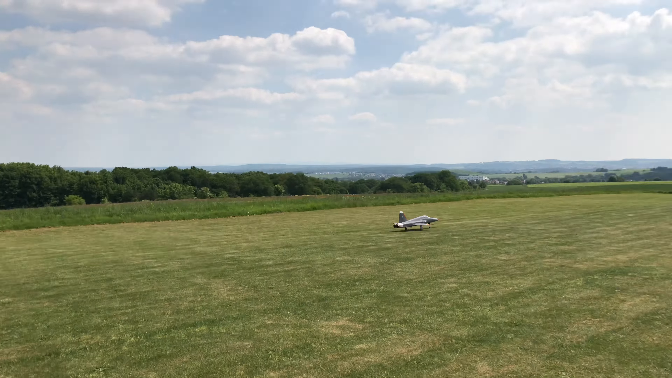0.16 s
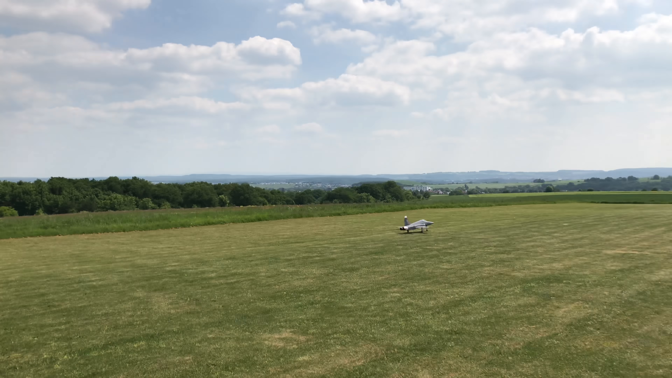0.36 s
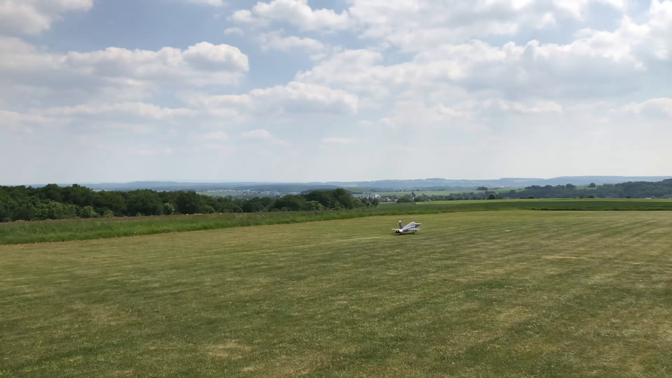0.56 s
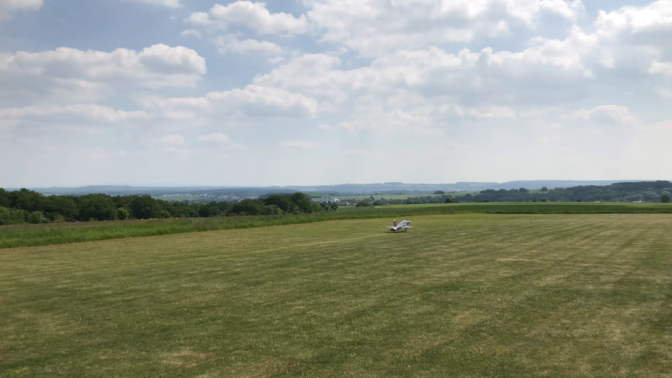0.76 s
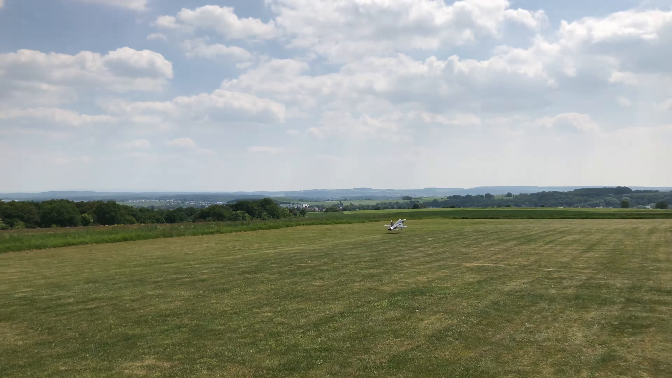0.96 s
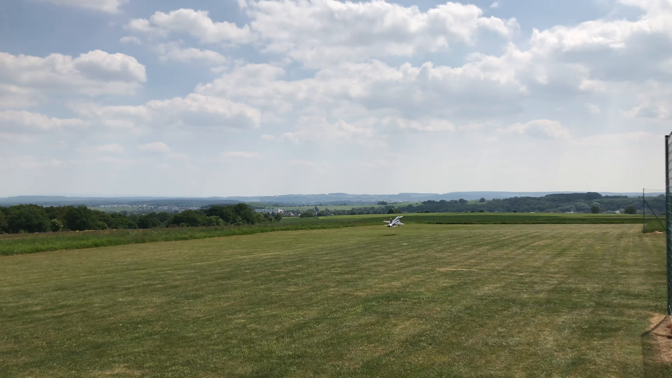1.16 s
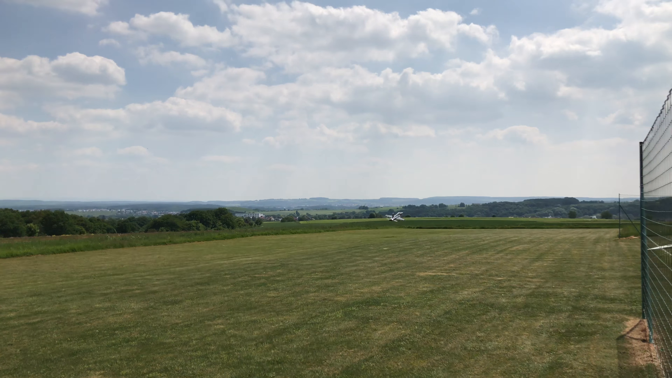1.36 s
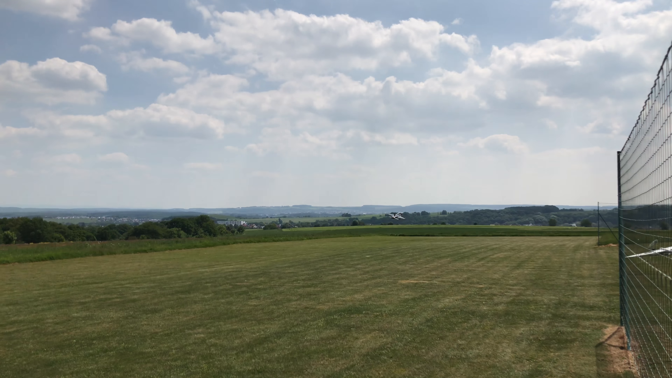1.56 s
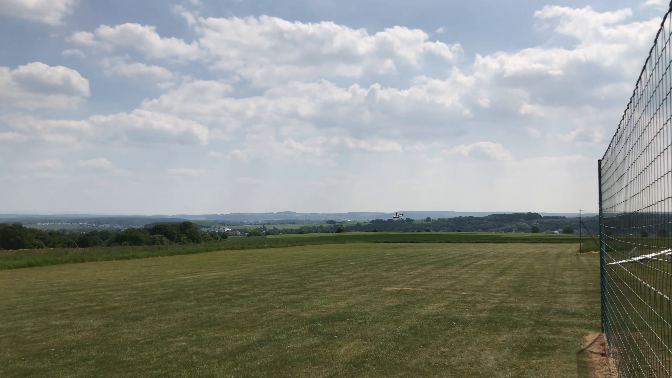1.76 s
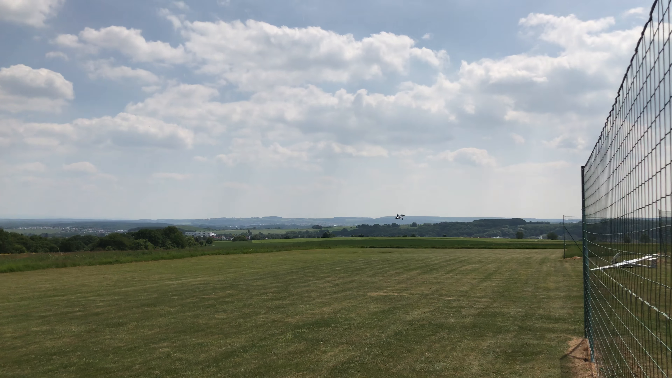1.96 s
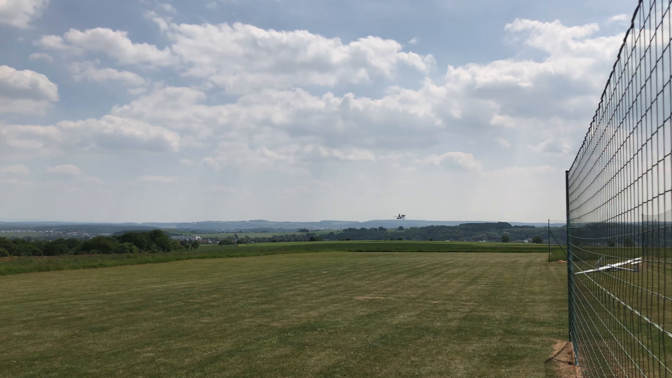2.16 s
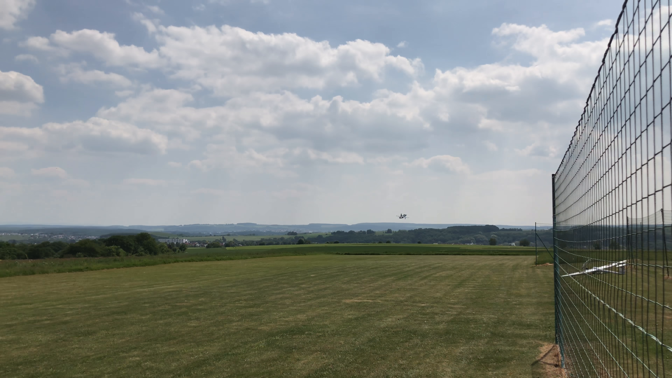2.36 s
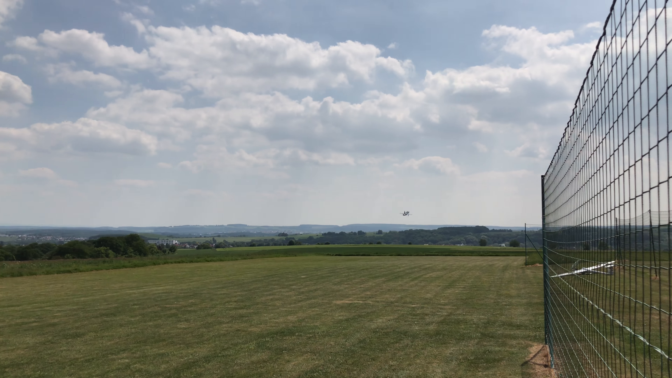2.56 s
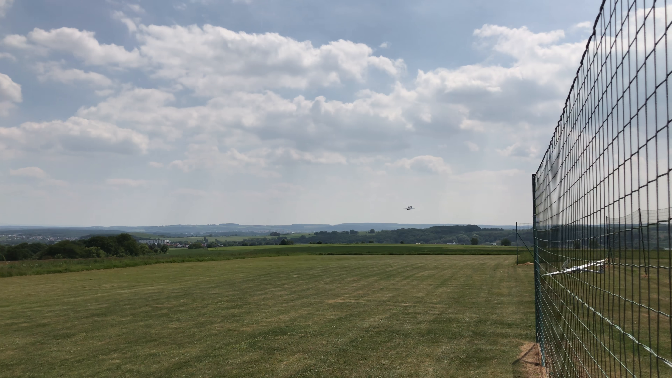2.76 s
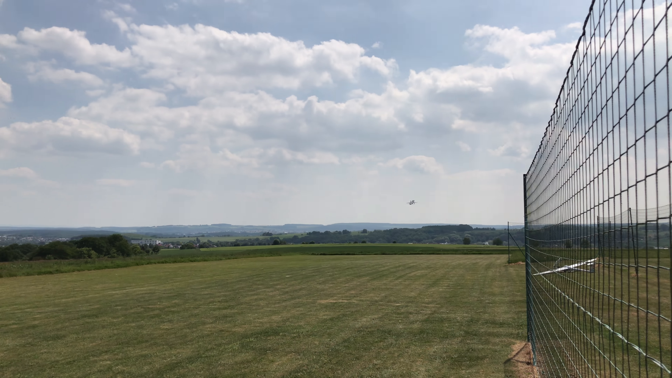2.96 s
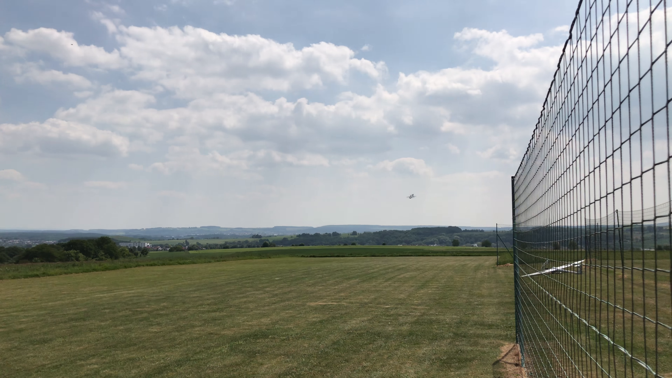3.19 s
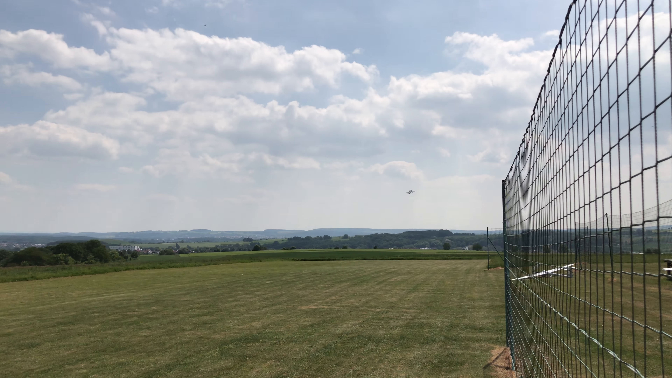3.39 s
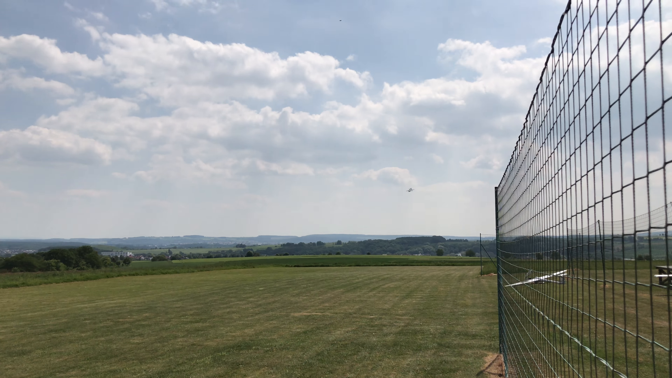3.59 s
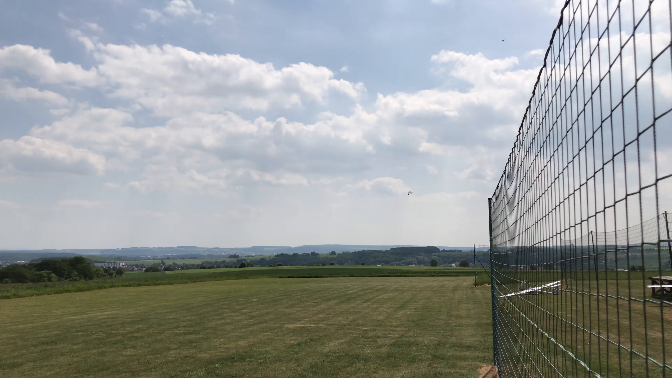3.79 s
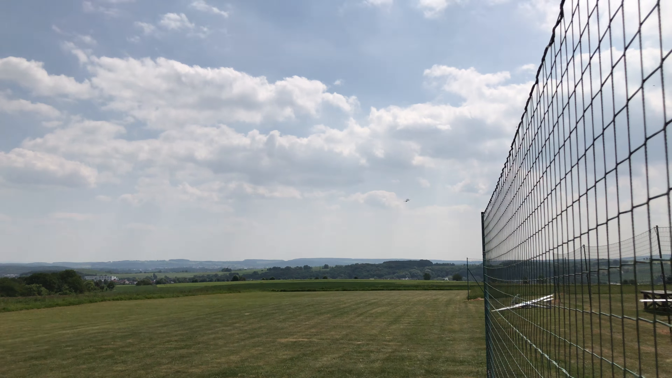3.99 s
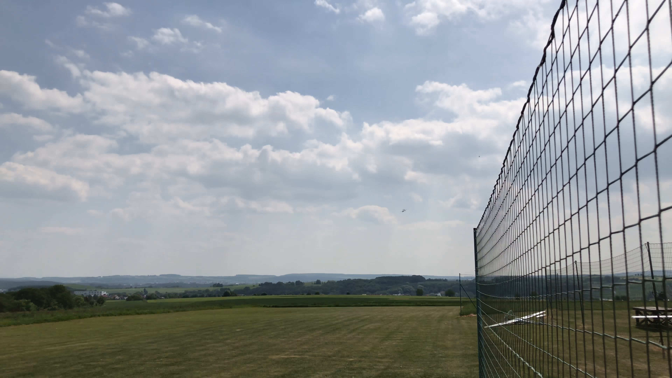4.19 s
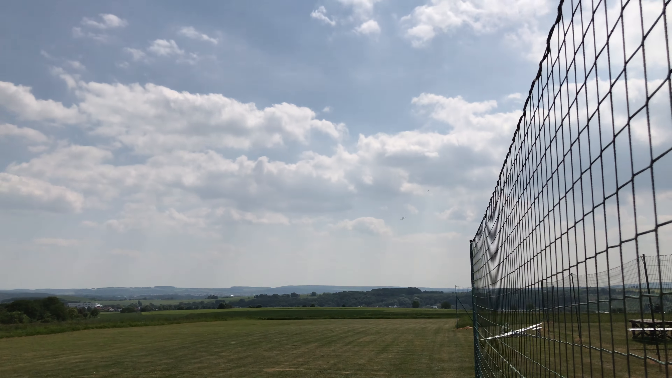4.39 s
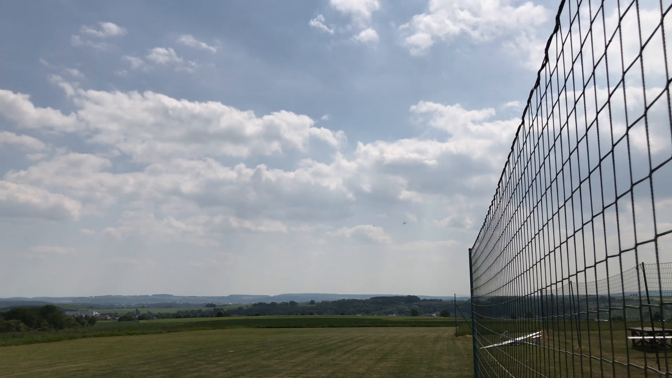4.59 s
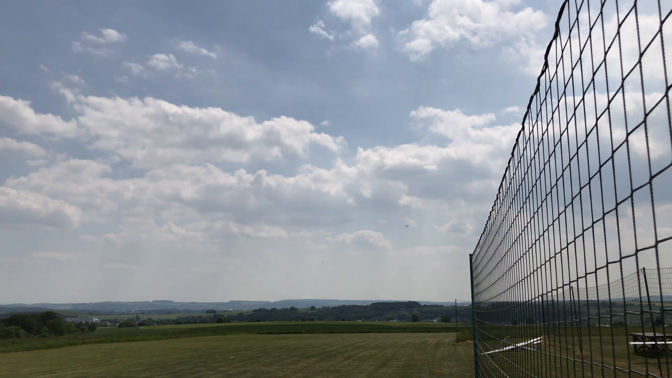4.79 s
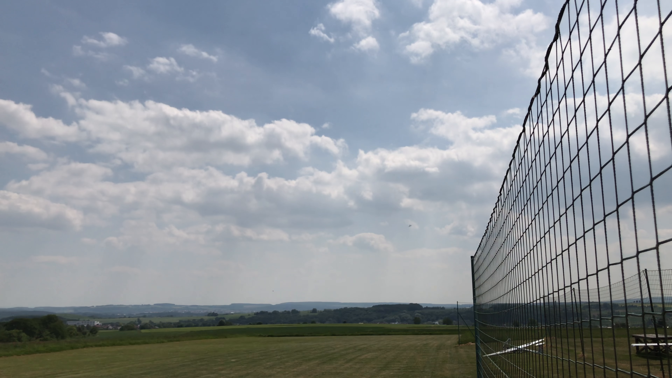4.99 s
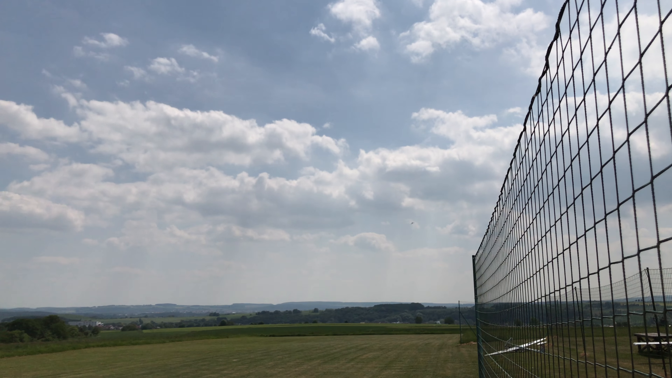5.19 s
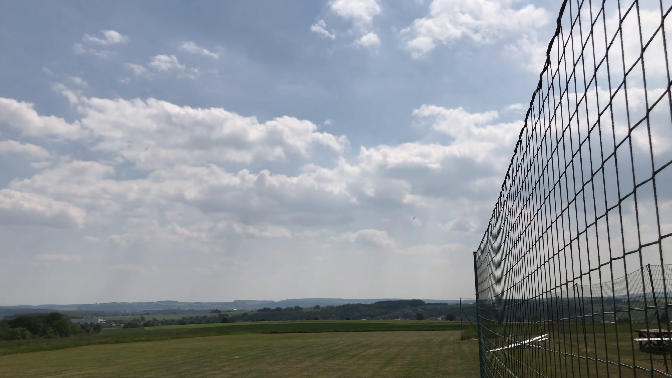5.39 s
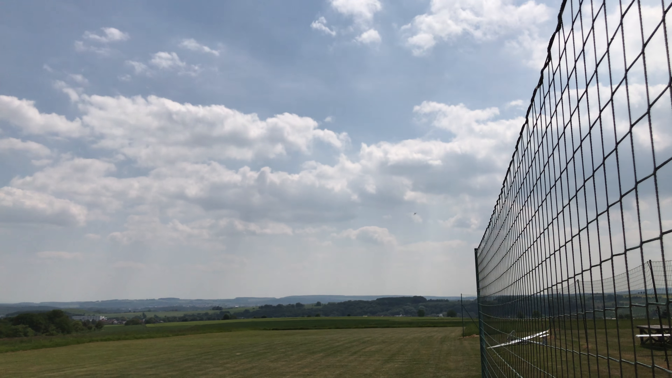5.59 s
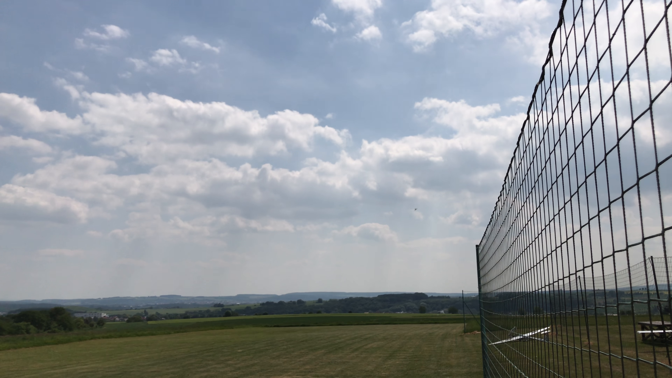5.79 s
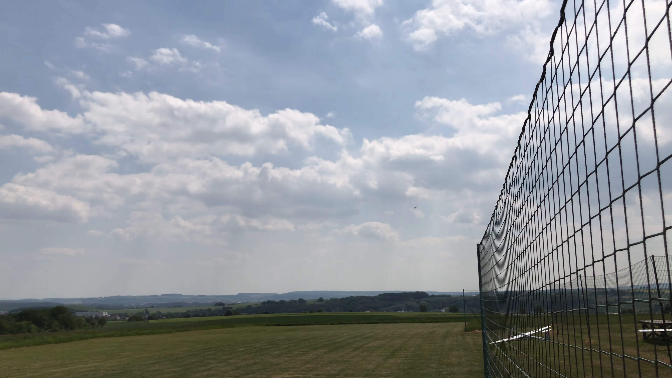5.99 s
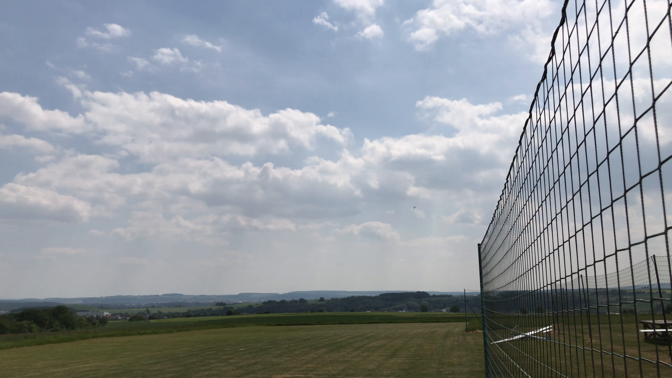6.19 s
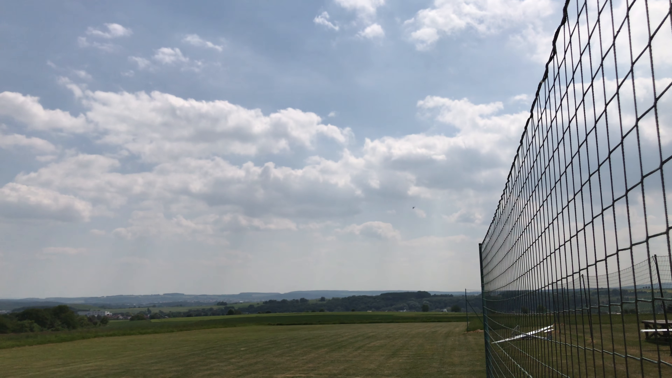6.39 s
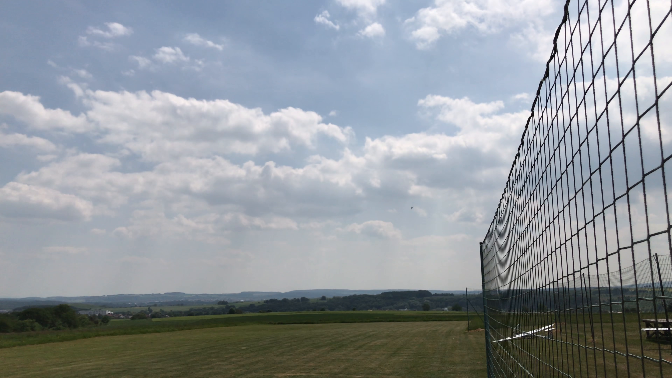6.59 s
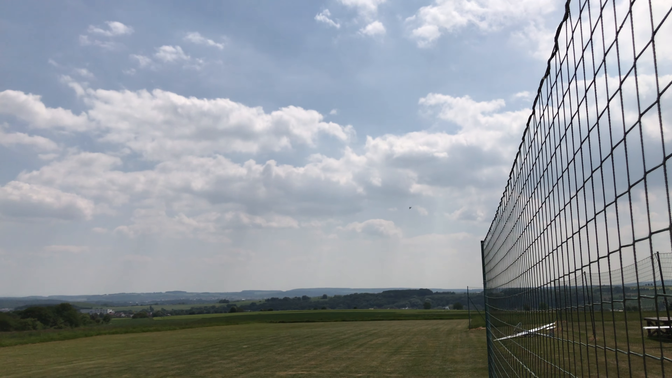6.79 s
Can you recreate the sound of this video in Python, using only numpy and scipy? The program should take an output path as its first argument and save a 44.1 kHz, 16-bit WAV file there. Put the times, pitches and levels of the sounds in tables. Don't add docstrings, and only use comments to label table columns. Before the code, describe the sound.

Outdoors on an open grass field, a model jet with electric fans starts close and loud, a shrill whine over hissing, rushing exhaust. It speeds away, fading quickly with fluttering treble and sliding hollow colouring after lift-off. Around four seconds the pitch drops steeply to a faint lower whine, rising again at the very end. Quiet countryside hum, a far engine drone and tiny insect rasps remain near the stationary microphone.

```python
import sys
import numpy as np
from scipy import signal
from scipy.io import wavfile
from scipy.ndimage import uniform_filter1d, map_coordinates

SR = 44100
rng = np.random.default_rng(int(sys.argv[2]) if len(sys.argv) > 2 else 0)


def pcm_store(signal):
    levels = np.round(np.clip(np.atleast_2d(signal), -1, 1) * 32767)
    wavfile.write(sys.argv[1], SR, levels.astype(np.int16).T)


def elevation(decibels):
    levels = np.asarray(decibels, float)
    return 10 ** (levels / 20)


N = 302085
T = np.arange(N) / SR
HZ = np.fft.rfftfreq(1024, 1 / SR)
FRAME_T = np.arange(N // 256 + 5) * 256 / SR

# time in seconds, blade tone of the slower fan in Hz, ducts' aim at the listener in dB,
# half the faster fan's lead over the slower in dB, purity of the tones in dB.
FLIGHT_PATH = [(0, 5240, -5, -10.5, 2), (.55, 5210, -5, -8, -3), (.72, 5136, -4.5, 11.5, -1.5),
               (1.25, 5034, -6, 9, 2), (1.42, 5136, -2, 10.5, -6.5), (1.68, 5058, -1, 6, 3),
               (2.5, 5013, -0.5, -3, 5.5), (3.1, 4946, 0, -0.5, 3.5), (3.94, 4963, -5, 3, -10),
               (4.06, 4422, 0, 0, 5), (4.36, 3821, -2, -10, 1.5), (4.54, 3670, 0.5, 0, -7.5),
               (4.67, 3333, -2, -2.5, 2.5), (5.2, 3188, 1, 4, 0.5), (5.62, 3250, -3.5, 2.5, -6.5),
               (5.88, 3330, -11, -4.5, 8.5), (6.4, 3340, -5, -6.5, 5), (6.85, 4090, -3.5, -5, 3.5)]
FULL_HZ, IDLE_HZ = 5200, 3200


def evened(x):
    return x / np.sqrt(np.mean(x ** 2) + 1e-20)


def columns(rows, t):
    s, *values = np.transpose(rows)
    return [np.interp(t, s, v) for v in values]


def read(points, hz):
    f, value = np.transpose(points)
    return np.interp(np.log(hz + 1), np.log(f + 1), value)


def resonate(x, hz, width):
    turn = np.exp(2j * np.pi * np.cumsum(hz * np.ones(len(x))) / SR)
    r = np.exp(-np.pi * width / SR)
    return 2 * (turn * signal.lfilter([1 - r], [1, -r], x / turn)).real


def band(hz, width):
    once = resonate(rng.standard_normal(N), hz, width)
    return evened(resonate(once, hz, width))


def drift(count):
    once = uniform_filter1d(rng.standard_normal(N), count)
    return evened(uniform_filter1d(once, count))


def noise(field_db, patchy_db):
    a, b, patches = rng.standard_normal((len(FRAME_T), len(HZ), 3)).T
    patches = evened(uniform_filter1d(uniform_filter1d(patches, 14, 0), 12, 1))
    white = np.std(signal.istft(a + 1j * b, nperseg=1024, noverlap=768)[1])
    z = (a + 1j * b) * elevation(field_db + patchy_db * patches)
    return signal.istft(z, nperseg=1024, noverlap=768)[1][:N] / white


def distance_m(t):
    return 10.74 + 10.6 * t + 9.2 * t ** 2 / 2


def idling(hz):
    return np.clip((FULL_HZ - hz) / (FULL_HZ - IDLE_HZ), 0, 1)


def heard_db(t):
    # level at the start in dB, loss at idle in dB,
    # air loss in dB per 100 m, share of the aim, share of the gusts.
    layers = [
        (-36, -13.5, 2.4, 0.2, .1),
        (-23, -6.5, -0.5, 0.26, 0.1),
        (-32, -15, 5.5, 0.53, 1.16),
        (-20.5, -6, 3.5, 1.19, 0.61),
    ]
    # time in seconds, gain in dB,
    # half width in seconds.
    gusts = [(0.029, 5, 0.028), (.13, 5.5, 0.041), (0.228, 8, 0.033), (.39, 5.5, 0.1), (.53, 3, 0.064),
             (.65, -1.5, 0.028), (.77, 4, 0.019), (.85, -3, .025), (.92, 1, .03), (1.01, -0.5, 0.037),
             (1.13, 5, 0.059), (1.28, -2.5, 0.041), (1.4, 2, 0.066), (1.49, 0.5, 0.025), (1.57, 2, 0.051),
             (1.78, 2, 0.044), (2.619, 0, .05), (2.85, 1.5, 0.042), (3.24, -0.5, 0.055), (3.36, 2, 0.073),
             (3.48, 5, 0.086), (3.65, 3.5, 0.053), (3.94, 4.5, 0.083), (4.27, -1.5, 0.06), (4.47, 4, 0.079),
             (4.74, -4, 0.088), (5.25, 3, 0.16), (6.471, 6, .08)]
    lift_s, lift_span_s, grass_db = 1.31, 0.097, -10.5
    hz, aim_db, *_ = columns(FLIGHT_PATH, t)
    metres = distance_m(t)
    spreading_db = -20 * np.log10(metres / distance_m(0))
    gust_db = sum(db * np.exp(-((t - s) / half) ** 2) for s, db, half in gusts)
    throttled = np.clip(1.04 * idling(hz) - .12, 0, 1) ** 0.86
    rumble, roar, hiss, whine = [
        db + spreading_db + idle_db * throttled - air_db * metres / 100 + aim * aim_db + gust * gust_db
        for db, idle_db, air_db, aim, gust in layers]
    on_grass = (1 - np.tanh((t - lift_s) / lift_span_s)) / 2
    return rumble, roar + grass_db * on_grass, hiss, whine


def exhaust():
    # lower edge in Hz, upper edge in Hz.
    jet_bands = [
        (120, 350),
        (500, 2600),
        (6200, 9000),
    ]
    # frequency in Hz, density in dB per Hz.
    exhaust_colour = [(40, -13.5), (80, -4), (220, 1), (400, -8.5), (620, -2), (850, -9), (1300, -5),
                      (2500, -2.5), (4000, -2), (6500, -0.5), (10800, 4), (13600, 0.5), (15800, 7.5),
                      (17500, 1)]
    # frequency in Hz, width in Hz, level over the roar in dB.
    roar_peaks = [
        (704.4, 100, -9.5),
        (1149, 52, -16),
        (1376, 67, -15),
        (966, 120, -14.5),
    ]
    # frequency in Hz, width in octaves, gain in dB.
    bass_swell = [
        (190, .5, 5),
        (400, .35, -10.5),
    ]
    swell_s, swell_span_s = 1.5, .55
    top_loss_db = 4

    *levels_db, _ = heard_db(FRAME_T)
    colour_db = read(exhaust_colour, HZ)
    in_band = [np.sum(elevation(2 * colour_db)[(HZ > lo) & (HZ < hi)]) / len(HZ) for lo, hi in jet_bands]
    lift_db = np.array(levels_db) - 10 * np.log10(in_band)[:, None]
    centres = np.log([np.sqrt(lo * hi) for lo, hi in jet_bands])
    shares = np.array([np.interp(np.log(HZ + 1), centres, row) for row in np.eye(len(centres))])
    air_db = np.outer(np.maximum(HZ - 8000, 0) / 1000, top_loss_db * distance_m(FRAME_T) / 100)
    flicker_db = 1.7 * np.outer(np.clip(HZ / 9000, 0, 1), np.interp(FRAME_T, T, drift(count=900)))
    swell_db = sum(db * np.exp(-(np.log2((HZ + 1) / hz) / octaves) ** 2) for hz, octaves, db in bass_swell)
    swell_db = np.outer(swell_db, np.exp(-((FRAME_T - swell_s) / swell_span_s) ** 2))
    field_db = colour_db[:, None] + swell_db + shares.T @ lift_db - air_db + flicker_db
    roar = noise(field_db, patchy_db=1.26)
    peaks = sum(elevation(db) * band(hz, width) for hz, width, db in roar_peaks)
    return roar + elevation(np.interp(T, FRAME_T, levels_db[1])) * peaks


def fans():
    fan_gap = .04
    tone_db, octave_db, octave_idle_db = -9, -25.5, 7
    octave_air_db = 1.7
    twinkle_db = 1.2
    hump_idle_db = -5
    width = 26.0

    hz, _, lean_db, pure_db = columns(FLIGHT_PATH, T)
    idle = idling(hz)
    faster_hz = hz * (1 + fan_gap * (1 - idle))
    level_db = np.interp(T, FRAME_T, heard_db(FRAME_T)[3])

    slower_tone = elevation(tone_db - lean_db + twinkle_db * drift(count=2500)) * band(hz, width)
    faster_tone = elevation(tone_db + lean_db + twinkle_db * drift(count=2500)) * band(faster_hz, 2.2 * width)
    tones = elevation(pure_db) * (slower_tone + faster_tone)

    hump = elevation(0.5) * band(hz * 1.0196, 350) + elevation(-2.5) * band(hz, 1800)
    hump = elevation(hump_idle_db * idle) * hump

    octave_pair = band(2 * faster_hz, 130) + band(2 * hz, 90)
    octave = elevation(-2.5 + .6 * pure_db + twinkle_db * drift(count=4000)) * octave_pair
    octave = octave + elevation(4.0) * band(1.8 * hz, 700)
    air_db = octave_air_db * (hz - IDLE_HZ) / 500 * distance_m(T) / 100
    octave = elevation(octave_db + octave_idle_db * idle - air_db) * octave
    return elevation(level_db + 0.48 * drift(count=700)) * (tones + hump + octave)


def over_grass(x):
    # time in seconds, extra path in ms, echo strength from 0 to 1.
    ground_echo = [(0, 0.049, 0.11), (1.3, 0.014, 0.12), (1.5, 0.14, 0.6), (1.65, 0.23, 0.46),
                   (1.9, .39, 0.43), (2.15, 0.46, 0.48), (2.55, 0.45, 0.6), (3, 0.56, 0.4),
                   (3.5, 0.737, 0.33), (4.1, 1.02, .4), (4.5, 1.25, 0), (5, 1.41, 0.33), (5.5, 1.48, 0.44),
                   (6.3, 1.5, 0.43), (6.85, 1.6, 0.29)]
    lag_ms, strength = columns(ground_echo, T)
    dull = signal.lfilter([.16, .68, .16], [1], x)
    echo = map_coordinates(dull, [np.arange(N) + 1 - lag_ms * SR / 1000], order=3, mode="nearest")
    strength = np.clip(strength, 0, .95)
    return (x - strength * echo) / np.sqrt(1 + strength ** 2)


def far_engine():
    # time in seconds, firing cycle in Hz, level in dB.
    engine_run = [(0, 15.5, -67), (1.5, 20.2, -58), (2.8, 20.4, -59.5), (3.7, 19.6, -65.5),
                  (4.7, 23.4, -54), (5.4, 24.3, -60.5), (6.85, 18.7, -59)]
    orders_db = [
        -1.5,
        1.3,
        -1.5,
        -1.4,
    ]
    hz, level_db = columns(engine_run, T)
    turns = np.cumsum(hz) / SR
    total = np.zeros(N)
    for k, db in enumerate(orders_db, start=2):
        tone = np.sqrt(2) * np.sin(2 * np.pi * (k * turns + rng.random()))
        total += elevation(level_db + db + 1.7 * drift(count=5000)) * tone
    return total


def land():
    # frequency in Hz, density in dB per Hz.
    land_colour = [(15, -21), (25, -3.5), (81, 0), (170, -7.5), (396, -12), (598, -6), (807, -16.5),
                   (1180, -21), (1940, -22), (3350, -21.5), (3740, -27), (5050, -36), (6460, -32),
                   (7610, -42), (17300, -41)]
    steady_db = read(land_colour, HZ)[:, None] + 0 * FRAME_T
    return elevation(-54.5) * evened(noise(steady_db, patchy_db=-0.8))


def cricket():
    # start in seconds, length in seconds, level in dB.
    chirps = [(2.81, .02, -61), (3.067, 0.022, -63), (3.26, 0.046, -64), (3.37, .03, -63), (3.52, .02, -62),
              (3.72, .17, -64), (4.14, 0.15, -64), (4.436, .03, -64), (4.507, .03, -69), (4.723, 0.11, -64),
              (5.14, .16, -63.5), (5.424, .1, -58), (5.65, 0.081, -67), (5.84, .03, -62),
              (6.008, 0.026, -62.5), (6.12, .08, -63), (6.27, 0.021, -66.5), (6.428, 0.065, -60.5),
              (6.538, 0.081, -63), (6.68, 0.083, -62.5)]
    strokes_per_s, sharpness = 44, 2.5
    strokes = np.zeros(N)
    for s, length, db in chirps:
        t = np.arange(0, length, 1 / SR)
        count = max(round(length * strokes_per_s), 1)
        stroke = np.abs(np.sin(np.pi * t * count / length)) ** sharpness
        strokes[round(s * SR):][:len(t)] += elevation(db) * stroke
    teeth = elevation(4.5 * drift(count=70) + 2.1 * drift(count=600))
    return elevation(-7.5) * strokes * teeth * band(16900, 900)


def shaft():
    hz = columns(FLIGHT_PATH, T)[0] / 11
    swell = np.exp(-((T - 4.2) / .25) ** 2)
    return elevation(-60) * swell * band(hz, 19)


def whistle():
    # multiple of the base pitch as a count, level in dB.
    whistle_orders = [
        (2, -55.5),
        (3, -59),
    ]
    late = np.clip(T - 4.45, -.5, .5)
    hz = 678 - 110 * late
    tones = sum(elevation(db) * band(k * hz, 26) for k, db in whistle_orders)
    return np.exp(-(late / .1) ** 2) * tones


def scene():
    jet = over_grass(exhaust() + fans())
    mix = jet + land() + far_engine() + cricket() + shaft() + whistle()
    return mix[None]


def band_limit(x):
    return signal.sosfilt(signal.butter(12, 17770, fs=SR, output="sos"), x)


def record(dry):
    bass_cut = signal.butter(2, 40, "high", fs=SR, output="sos")
    treble_cut = signal.firwin(511, 17300, window=("kaiser", 9), fs=SR)
    limited = signal.oaconvolve(signal.sosfilt(bass_cut, dry), treble_cut[None], "same")
    return band_limit(limited)


dry = scene()
out = record(dry)
pcm_store(out)
```